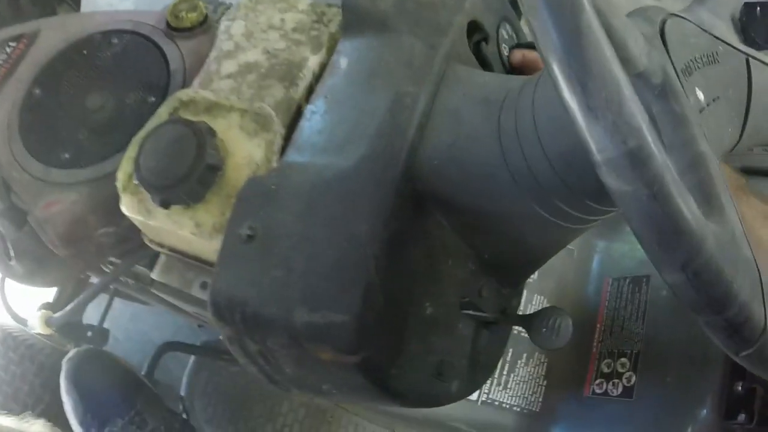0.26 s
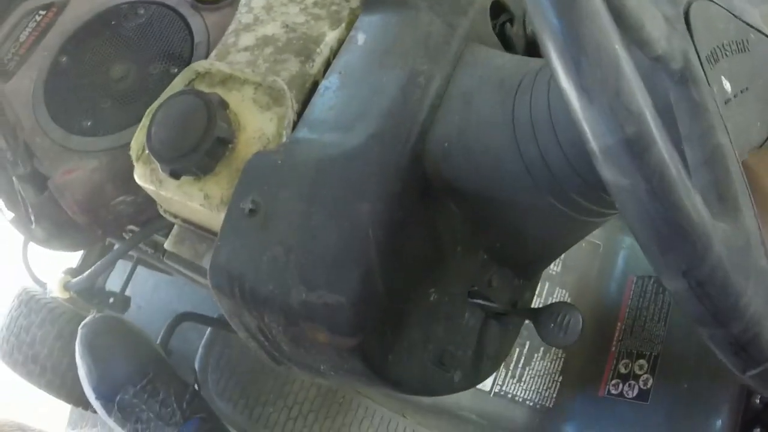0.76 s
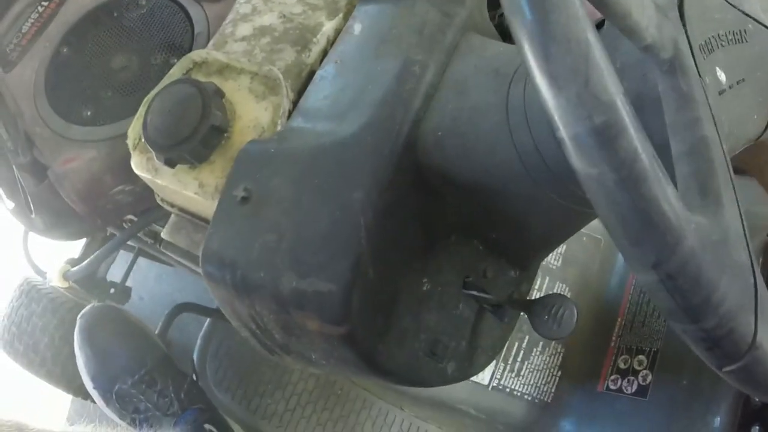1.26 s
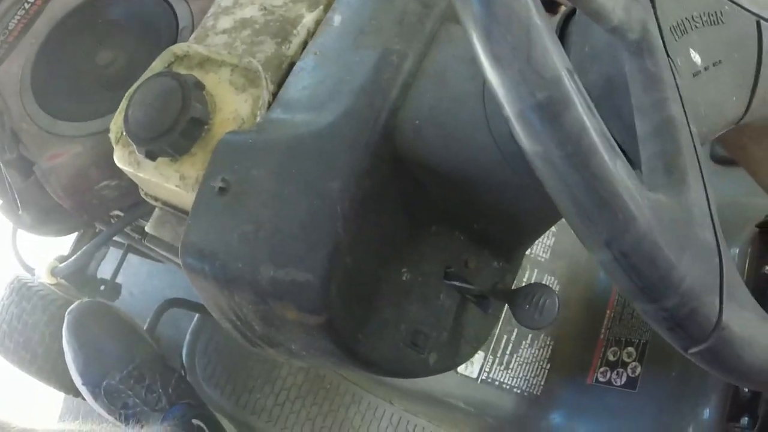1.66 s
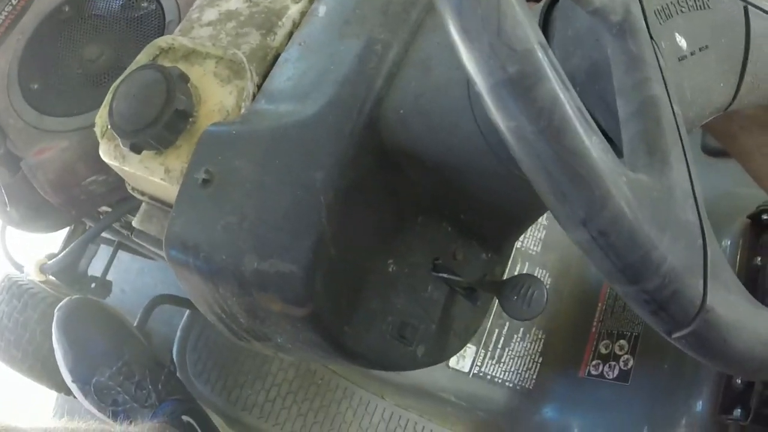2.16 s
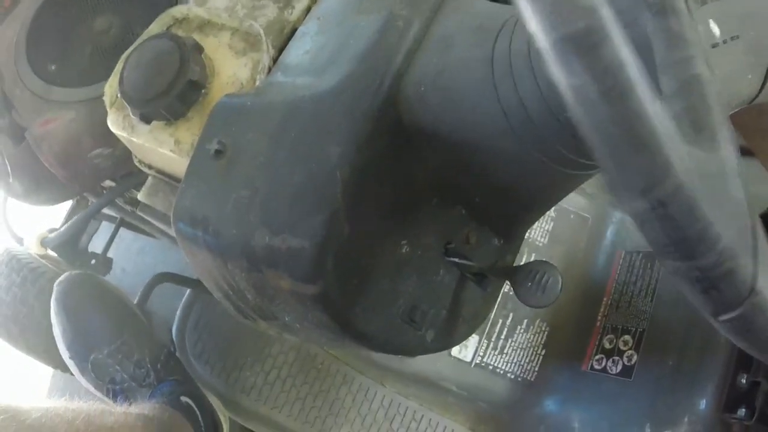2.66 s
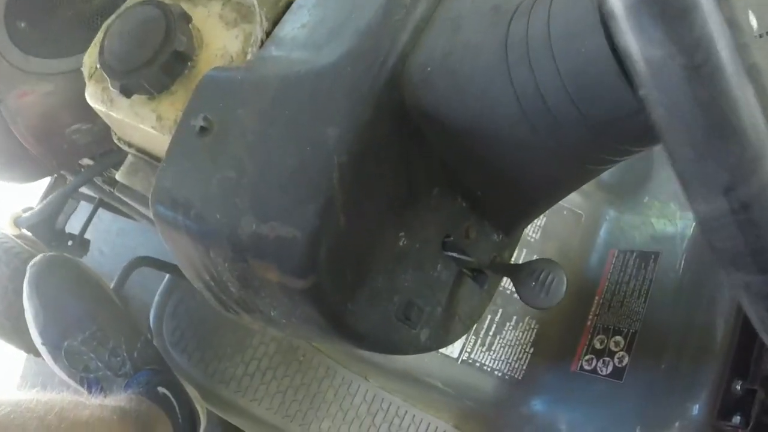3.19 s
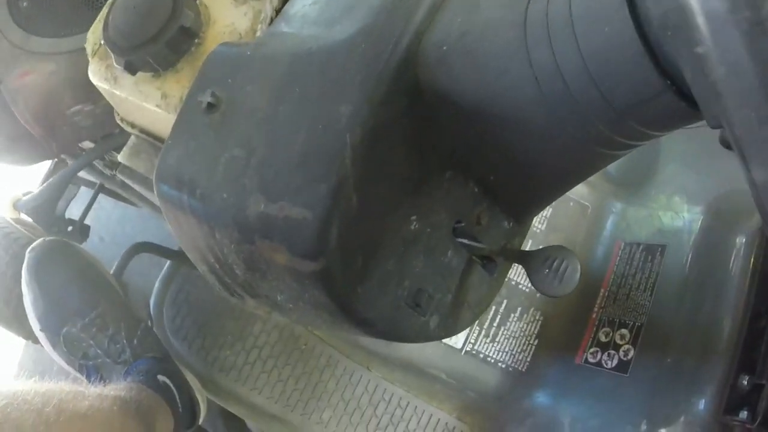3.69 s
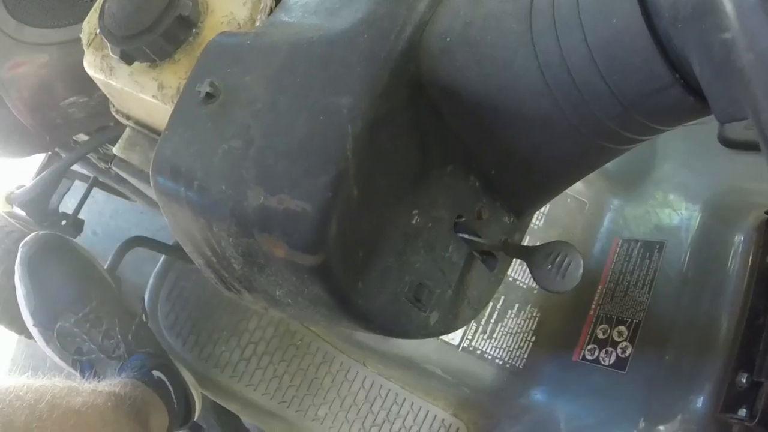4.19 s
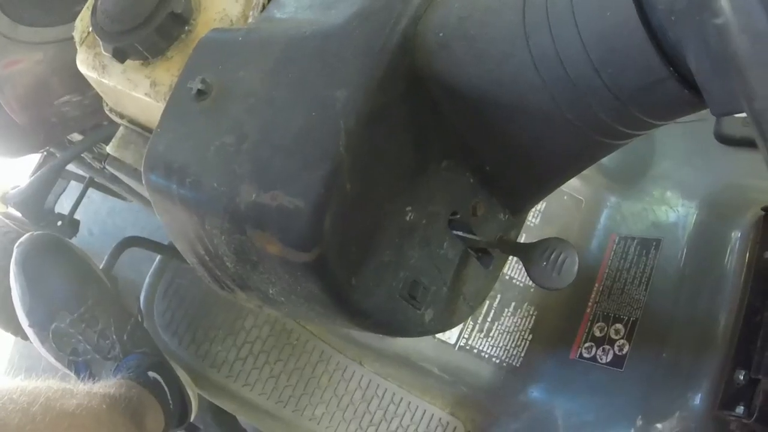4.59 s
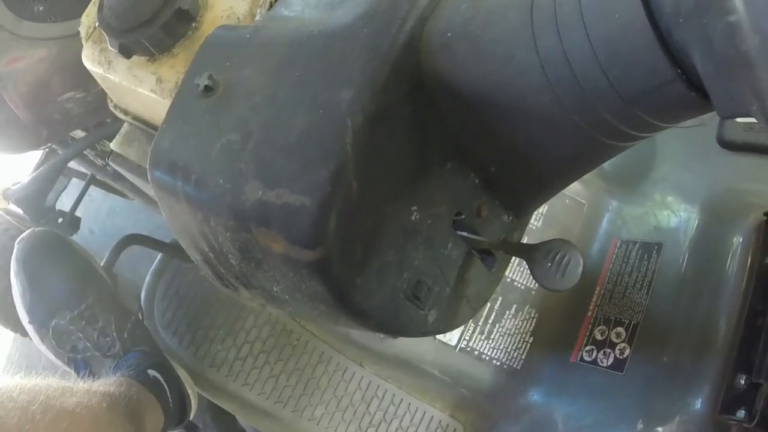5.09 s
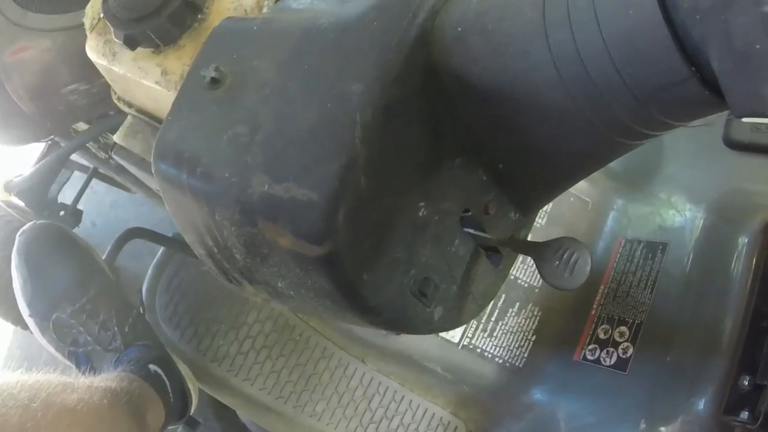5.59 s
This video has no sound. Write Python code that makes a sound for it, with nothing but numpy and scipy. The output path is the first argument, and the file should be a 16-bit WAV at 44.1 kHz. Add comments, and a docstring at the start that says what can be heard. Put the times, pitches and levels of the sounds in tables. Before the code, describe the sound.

Starter gear clanks and clunks against a stubborn engine, with brief growling, whining turns and sinking groans, never catching, in an echoing garage.

```python
"""The dying echo of a blow, then faint outdoor air and harder clanks: a riding mower in a garage will not start,
heard from the seat. The starter pinion clanks into the ring gear and clunks back; every blow rings the same block
and frame. In between, gear teeth rumble, whine and grind for a weak stroke or groan to a stall on compression. Dry
metal ticks and squeaks, valves puff, and once the freed starter whirrs down. Walls and floor return an echo."""
import sys
import numpy as np
from scipy import signal
from scipy.fft import rfft, irfft, next_fast_len
from scipy.io import wavfile
from scipy.ndimage import uniform_filter1d

SR = 44100
rng = np.random.default_rng(int(sys.argv[2]) if len(sys.argv) > 2 else 0)


def store_pcm(level_fs):
    """Save levels as 16-bit WAV."""
    pcm = np.round(np.clip(level_fs, -1, 1) * 32767).astype(np.int16)
    wavfile.write(sys.argv[1], SR, np.atleast_2d(pcm).T)


N = 257984
T = np.arange(N) / SR
BINS = np.linspace(0, SR / 2, next_fast_len(N, True) + 1)  # filter frequencies in Hz

# engine block on its mounts, heavily damped: mode_hz, relative level_db, t60_s
BLOCK = [(457, 1, 0.053), (576.4, 0, 0.046), (621.4, -1, 0.048)]
# frame, deck and hood: mode_hz, relative level_db, t60_s
FRAME = [(131.2, -21.5, 0.19), (170.4, -23.5, 0.35), (220.3, -22.5, 1), (306.6, -10, 0.29),
         (322.8, -13, 0.82), (385.5, -7.5, 0.18), (457.5, -8.5, 0.13), (560, -7, 0.14), (561.8, -1, 0.096),
         (634, -2.5, 0.048), (698.8, -7, 0.11), (772, -6, 0.065), (910, -50, .12), (1018, -23.5, 0.16),
         (1277, -12, 0.092), (1904, -11.5, 0.056)]
# colour of clashing steel and of hissing air: frequency_hz, relative level_db
CLASH = [(59, -77.5), (100, -13.5), (231, 0), (594, 1.5), (867, -3.5), (1090, -8), (1190, -8),
         (1590, -14.5), (1920, -11), (2520, -18), (3110, -13), (8340, -25.5), (9860, -27.5), (15000, -44)]
# the starter drags the engine round, one row a stroke: start_s, run_up_s, start_mesh_hz, top_mesh_hz, rumble_db,
# rumble_swell_db over the run-up, grind_db, grind_rise_db_per_octave, whine_db, fade_db_per_s
STROKES = [(1.48, 0.48, 192.2, 574.8, -16, 11, -22, 22, -19.5, 182),
           (4.64, .215, 169.4, 351, -20.5, 24, -14, 57, -24.5, 250),
           (5.27, .1, 169.7, 340.9, -22, 19, -25.5, 34.5, -29, 173),
           (5.795, 0.012, 321, 335.5, -14, 9, -28, 40, -35, 280)]


def amp(db):
    """Decibels to gain."""
    return 10 ** (np.asarray(db) / 20)


def unit(x):
    """Scale to rms 1."""
    return x / np.sqrt(np.mean(x ** 2) + 1e-18)


def noise():
    """White noise."""
    return rng.standard_normal(N)


def walk(hz):
    """Smooth random wander with spread 1 and hz random knots a second."""
    knots = rng.standard_normal(N)
    return unit(np.interp(T * hz, np.arange(N), knots))


def fade(start, end, edge):
    """Gate that is open from start to end, with soft edges outside."""
    return np.clip(1 + np.minimum(T - start, end - T) / edge, 0, 1)


def burst(start, decay, rise):
    """Envelope of a contact: a quick rise and an exponential fall."""
    age = np.maximum(T - start, 0)
    return np.minimum(age / rise, 1) * np.exp(-np.maximum(age - rise, 0) / decay)


def swell(centre, half):
    """Bell-shaped envelope."""
    return np.exp(-((T - centre) / half) ** 2 / 2)


def on_log_axis(hz, points):
    """Read (Hz, value) points on a log-frequency axis."""
    f, value = np.transpose(points)
    return np.interp(np.log(np.maximum(hz, 1)), np.log(f), value)


def causal(x, gain):
    """Minimum-phase filter with the given gain on evenly spaced frequencies up to SR / 2."""
    size = 2 * (len(gain) - 1)
    cepstrum = irfft(np.log(gain), size)
    cepstrum[1:size // 2] *= 2
    cepstrum[size // 2 + 1:] = 0
    response = np.exp(rfft(cepstrum))
    return irfft(rfft(x, size) * response, size)[:N]


def colour(x, points):
    """Shape with a spectrum of (Hz, dB) points; white noise keeps its power."""
    return causal(x, unit(amp(on_log_axis(BINS, points))))


def resonance(at_hz, peaks):
    """Gain of a set of (Hz, width Hz, dB) resonances at the given frequencies."""
    return np.sqrt(sum(amp(db) ** 2 / (1 + (2 * (at_hz - hz) / width) ** 2) for hz, width, db in peaks))


def ringing(force, modes, corner_hz, tilt_db, build):
    """Ring a body's modes; a soft contact weakens those above the corner, and the panels take a moment to swing."""
    t = T[:SR // 2]
    ring = 0
    for k, (hz, db, t60) in enumerate(modes):
        octaves = np.log2(hz / BLOCK[0][0])
        gain = amp(db + tilt_db * octaves) / np.hypot(1, (hz / corner_hz) ** 2)
        mode = gain * np.sin(2 * np.pi * hz * t) * np.exp(-np.log(1000) * t / t60)
        ring = ring + (-1) ** k * mode
    return signal.fftconvolve(force, ring * (1 - np.exp(-t / build)))[:N]


def blows(table, spectrum, corner_hz, tilt_db, build, rise, grain_db, block_db):
    """Each blow knocks the block, rings the frame and sets loose steel parts chattering."""
    force, chatter = np.zeros(N), np.zeros(N)
    for s, ring_db, chatter_db, decay in table:
        force[int(s * SR)] += amp(ring_db)
        chatter += amp(chatter_db) * burst(s - rise / 2, decay, rise)
    contacts = unit(noise() * amp(grain_db * walk(900)))
    knock = amp(block_db) * ringing(force, BLOCK, corner_hz, 0, build=0.013)
    frame = ringing(force, FRAME, corner_hz, tilt_db, build)
    return knock + frame + colour(chatter * contacts, spectrum)


def slack_clunks():
    """The crank rocks back and the gears take up their slack: soft blows with a strong block knock."""
    # levels ahead of the trim in scene(): time_s, frame_ring_db, rattle_db, rattle_decay_s
    clunk_rows = [(.003, -46, -25, 0.033), (.603, -35, -36, 0.022), (1.932, -16.5, -16, 0.014),
                  (1.960, -14, -18.5, 0.081), (2.423, -17.5, -20, 0.025), (2.497, -28, -30.5, 0.024),
                  (3.506, -18, -20, 0.019), (4.352, -18, -17.5, 0.0098), (4.365, -36, -27, 0.0072),
                  (4.812, -23.5, -22.5, 0.062), (4.878, -20, -24, 0.025), (5.225, -19.5, -19, 0.029),
                  (5.388, -25, -29, 0.006), (5.434, -26.5, -21, 0.0027), (5.783, -14, -8.5, 0.02)]
    # colour of the rattle: frequency_hz, relative level_db
    rattle_points = [(50, -57), (120, -4.5), (300, 2), (480, 5), (620, -4.5), (800, -8), (1200, -20),
                     (1950, -16.5), (2700, -27), (3500, -21), (6600, -36.5), (11000, -44), (15000, -61)]
    return blows(clunk_rows, rattle_points, corner_hz=905, tilt_db=0.5, build=0.0021, rise=0.016,
                 grain_db=0, block_db=16.5)


def pinion_clanks():
    """The pinion slams into the ring gear: hard steel blows that ring the frame high up."""
    # levels ahead of the trim in scene(): time_s, frame_ring_db, steel_clash_db, clash_decay_s
    engage_rows = [(.004, -35, -37.5, 0.091), (.596, -27, -28.5, 0.0017), (.607, -31, -26, 0.0078),
                   (.641, -36, -33, 0.0047), (1.445, -12.5, -12, 0.012), (3.048, -22, -21.5, 0.019),
                   (3.848, -20, -21, 0.015), (4.595, -22, -20, 0.016), (5.770, -29, -13, 0.009),
                   (5.794, -42, -14, 0.011)]
    return blows(engage_rows, CLASH, corner_hz=3000, tilt_db=3.0, build=0.0053, rise=0.01,
                 grain_db=0.5, block_db=-25)


def outdoor_air():
    """Faint broadband air from outdoors, its level wandering slightly."""
    # frequency_hz, relative level_db
    air_points = [(12, -29), (20, -8), (59, -5), (84, -9.5), (118, -6), (211, -12), (571, -14), (841, -21),
                  (1210, -22), (1830, -26), (2340, -27), (5530, -35), (15000, -51)]
    level_db = -52 + 0.14 * walk(1.9)
    return unit(colour(noise(), air_points)) * amp(level_db)


def ticks():
    """Small dry contacts of key and linkage: short bursts of coloured noise."""
    # time_s, level_db, decay_s
    tick_rows = [(1.270, -47, 0.034), (1.362, -51.5, 0.037), (5.253, -36.5, 0.0059), (5.434, -40, 0.0062)]
    # frequency_hz, relative level_db
    tick_points = [(200, -4), (700, 7), (1500, 1.5), (2200, 0), (3000, -6.5), (10000, -15.5), (15000, -32)]
    envelope = sum(amp(db) * burst(s, decay, rise=0.0013) for s, db, decay in tick_rows)
    return colour(noise() * envelope, tick_points)


def glides(table, sag, wander, octave_db):
    """Short unsteady tones with their octave, each sinking through its pitch by the same share."""
    out = np.zeros(N)
    for s, length, hz, db, waver in table:
        on = (T >= s) & (T < s + length)
        progress = (T[on] - s) / length
        pitch = hz * (1 + sag * (.5 - progress)) * (1 + waver * wander[on])
        phase = 2 * np.pi * np.cumsum(pitch) / SR
        envelope = np.sqrt(np.abs(np.sin(np.pi * progress)))
        out[on] += amp(db) * envelope * (np.sin(phase) + amp(octave_db) * np.sin(2 * phase))
    return out


def squeaks():
    """Stick and slip of dry metal in key switch and starter shaft: short falling whistles, some of them grainy."""
    # levels ahead of the treble filter: start_s, length_s, pitch_hz, level_db, pitch_waver_share
    squeak_rows = [(1.272, .06, 2215, -57, 0.0093), (1.56, .051, 6430, -43, 0.049),
                   (1.748, 0.022, 9280, -41.5, 0.009), (2.125, 0.031, 6605, -37, 0.014),
                   (3.162, 0.042, 6490, -49, 0.013), (3.958, 0.026, 6440, -45.5, .008),
                   (4.244, 0.031, 6340, -44, 0.0029), (4.263, .037, 6320, -30, 0.0032),
                   (4.838, 0.028, 6840, -35, 0.016), (5.35, 0.022, 3990, -43.5, 0.126),
                   (5.35, .035, 9500, -55.5, 0.02), (5.49, 0.016, 9200, -57, .02),
                   (5.781, 0.011, 6980, -25.5, 0.0067), (5.81, 0.024, 9200, -36, .009)]
    # the highest overtones fall away: frequency_hz, relative level_db
    treble_points = [(13000, 26), (14200, -26)]
    whistles = glides(squeak_rows, sag=0.03, wander=walk(1200), octave_db=-15.5)
    return colour(whistles, treble_points)


def mesh_rate():
    """Teeth meshing per second: each stroke gathers speed evenly, then slows no further than its start rate."""
    slowing_hz_per_s = 200
    hz = np.full(N, 1. * STROKES[0][2])
    for s, run_up, start_hz, top_hz, *_ in STROKES:
        spent = np.maximum(T - s - run_up, 0)
        speed = np.interp(T, [s, s + run_up], [start_hz, top_hz]) - slowing_hz_per_s * spent
        hz = np.where(T >= s, np.maximum(speed, start_hz), hz)
    return hz


def rotor_rub(turns):
    """The rotor passes the same roughness on every turn: a comb of lines that glides with its speed."""
    track = signal.resample(rng.standard_normal(size=256), num=4096)
    return unit(np.interp(turns % 1, np.linspace(0, 1, len(track)), track))


def mesh_force(teeth):
    """Teeth knock and slide on each other over the growling rotor, which turns once in four teeth."""
    size = amp(1.0 * noise()[teeth.astype(int)])  # worn teeth bear unevenly: 1 dB spread
    knocks = unit(np.diff(np.floor(teeth), prepend=0) * size)
    sliding = unit(noise() * size * np.exp(-(teeth % 1) / 0.42))  # dies off within each tooth
    growl = rotor_rub(teeth / 4)
    judder = amp(3.5 * walk(70))  # the load snatches
    return unit(judder * (sliding + amp(-6) * (knocks - knocks.mean()) + amp(2) * growl))


def tooth_scrape(force):
    """Tooth flanks scrape dry for a moment: brief bright swells of the mesh force."""
    # levels ahead of the common trim: centre_s, half_length_s, level_db
    scrape_rows = [(1.481, .008, -28), (1.703, 0.027, -40), (1.77, 0.024, -37.5), (1.855, .016, -38),
                   (1.968, 0.0088, -41.5), (4.851, 0.011, -39), (5.438, 0.0032, -39.5),
                   (5.793, 0.0054, -24)]
    # frequency_hz, relative level_db
    scrape_points = [(4000, -14), (7000, 6), (9800, 7), (12000, -7), (15000, -10)]
    trim_db = -8.5
    envelope = sum(amp(db) * swell(s, half) for s, half, db in scrape_rows)
    return unit(colour(force, scrape_points)) * envelope * amp(trim_db)


def cranking():
    """The mesh force makes the frame rumble and the housing grind, and the gears whine at the mesh rate."""
    # colours of rumble and of grind: frequency_hz, relative level_db
    rumble_points = [(53, -40), (90, -29.5), (286, 0), (318, -1.5), (515, -1.5), (567, -14), (687, -1),
                     (742, -16.5), (900, -34.5), (1170, -24.5), (1980, -120)]
    grind_points = [(450, -30), (780, -1.5), (1050, -3.5), (1400, -1), (1800, -2), (2600, -11), (3400, -8),
                    (4400, -12.5), (6300, -12.5), (7500, -34), (11000, -74)]
    # flywheel and starter housing: centre_hz, width_hz, relative level_db
    housing_peaks = [(684, 10, 10), (806, 23, 6.5), (893, 20, 6), (1001, 19, 3.5), (1056, 28, 2),
                     (1200, 20, -24), (1312, 20, -2), (1440, 21, 3.5), (1552, 27, -4.5), (1790, 22, 1),
                     (1787, 19, 4), (1936, 38, -6), (1950, 50, -16)]
    # the whine stands out where the mesh rate sweeps through these frame resonances: centre_hz, width_hz, level_db
    whine_peaks = [(337, 52, -2.5), (554, 64, -3)]
    hardest_grind_hz, ease_db_per_octave = 409, 13

    speed = mesh_rate()
    teeth = np.cumsum(speed * (1 + .007 * walk(120))) / SR  # slightly jittered count of teeth
    force = mesh_force(teeth)

    frame = unit(ringing(force, FRAME, corner_hz=972, tilt_db=-0.5, build=0.021))
    rumble = unit(unit(colour(force, rumble_points)) + amp(-3) * frame)

    housing = unit(causal(force, resonance(BINS, housing_peaks)))
    grind = unit(unit(colour(force, grind_points)) + amp(-2) * housing)
    octaves = np.log2(speed / hardest_grind_hz)
    # above the hardest rate the flywheel carries part of the load
    grind = grind * amp(-ease_db_per_octave * np.maximum(octaves, 0))

    tones = np.sin(2 * np.pi * teeth) + amp(-7) * np.sin(4 * np.pi * teeth)
    whine = resonance(speed, whine_peaks) * tones

    out = tooth_scrape(force)
    for s, run_up, _, _, rumble_db, swell_db, grind_db, grind_rise_db, whine_db, fade_db in STROKES:
        effort = np.clip((T - s) / run_up, 0, 1)
        spent = np.maximum(T - s - run_up, 0)
        envelope = fade(s, T[-1], edge=0.019) * amp(-fade_db * spent)
        stroke = rumble * amp(rumble_db - swell_db * (1 - effort))
        stroke = stroke + whine * amp(whine_db)
        stroke = stroke + grind * amp(grind_db + grind_rise_db * np.minimum(octaves, 0))
        out = out + envelope * stroke
    return out


def puffs():
    """The piston shoves air through a valve: a low thump with a hiss."""
    # centre_s, half_length_s, thump_db, hiss_db
    puff_rows = [(1.574, 0.017, -36, -32), (1.869, 0.016, -34.5, -19), (1.99, 0.019, -43, -47),
                 (5.801, 0.017, -45, -28)]
    # colour of the thump: frequency_hz, relative level_db
    thump_points = [(20, -17), (40, 7), (100, 4), (170, -3), (400, -37)]
    thump, hiss = colour(noise(), thump_points), colour(noise(), CLASH)
    return sum(swell(s, half) * (amp(thump_db) * thump + amp(hiss_db) * hiss)
               for s, half, thump_db, hiss_db in puff_rows)


def stalls():
    """The loaded gears slow down against compression with a rough sinking groan."""
    # start_s, length_s, pitch_hz, level_db, pitch_waver_share
    stall_rows = [(2.48, 0.093, 160, -34, 0.039), (3.08, 0.091, 368, -29, .14),
                  (3.14, 0.13, 218.7, -35.5, 0.022), (3.88, 0.099, 280.8, -37.5, 0.244),
                  (4.62, 0.092, 287.4, -37, 0.28)]
    return glides(stall_rows, sag=0.12, wander=walk(300), octave_db=-17.5)


def coasting():
    """The freed starter whirrs down once: sinking lines over the soft rub of its brushes."""
    # frequency_hz, relative level_db
    whirr_points = [(700, -4), (1000, -5.5), (1450, -20), (1750, 3.5), (2150, -5), (2800, -15), (3200, -3),
                    (4000, -10), (6800, -14), (7600, -23), (8600, -32), (10700, -27), (12000, -40),
                    (15000, -61)]
    start_s, attack_s, hold_s, length_s = 4.835, 0.017, 0.043, .38
    turns_hz, sag_hz_per_s = 113.3, 43
    level_db, fade_db_per_s = -38, 58

    age = np.clip(T - start_s, 0, length_s)
    speed = (turns_hz - sag_hz_per_s * age) * (1 + 0.0016 * walk(40))
    turns = np.cumsum(speed) / SR
    brushes = amp(-14) * noise()
    whirr = unit(colour(rotor_rub(turns) + brushes, whirr_points))
    db = level_db - fade_db_per_s * np.maximum(age - attack_s - hold_s, 0)
    gate = fade(start_s, start_s + length_s, edge=.02)
    return whirr * amp(db) * np.minimum(age / attack_s, 1) * gate


def garage(x):
    """Diffuse echo of walls and floor: noise in octave bands, each with its own decay, shortest at the top."""
    # frequency_hz, t60_s
    decay_points = [(100, 0.5), (300, 0.64), (700, 0.39), (2000, 0.51), (6000, 0.41), (13000, 0.18)]
    wet_db, gap_s, even = -2.0, 0.01, 0.36  # even: share of the noise echo's ripple that is taken out

    t = T[:SR]
    wash = rfft(rng.standard_normal(len(t)))
    hz = np.fft.rfftfreq(len(t), 1 / SR)
    octave = np.log2(np.clip(hz, 62.5, 16000) / 1000)
    echo = 0
    for k in range(-4, 5):  # octaves from 1 kHz
        t60 = on_log_axis(1000 * 2. ** k, decay_points)
        envelope = np.exp(-np.log(1000) * t / t60) * np.clip(t / gap_s - .5, 0, 1)
        band = irfft(wash * np.maximum(1 - np.abs(octave - k), 0), len(t))
        echo = echo + band * envelope / np.linalg.norm(envelope)
    response = signal.unit_impulse(len(t)) + amp(wet_db) * echo
    # part of the noise echo's ripple is taken out, for a smoother, less tonal room
    power = np.abs(rfft(response, 2 * (len(BINS) - 1))) ** 2
    ripple = uniform_filter1d(power, size=90) / uniform_filter1d(power, size=5000)
    return causal(signal.fftconvolve(x, response)[:N], ripple ** (-even / 2))


def scene():
    """The mower in its garage over faint outdoor air."""
    hits = amp(-2.5) * (slack_clunks() + pinion_clanks())  # the first rows stand for the tail of an earlier blow
    mower = hits + ticks() + squeaks() + cranking() + puffs() + stalls() + coasting()
    return (garage(mower) + outdoor_air())[None]


def record(dry):
    """The microphone clips at full scale, then a steep low-pass cuts the top."""
    top_hz = 15250
    low_pass = signal.ellip(10, .2, 80, top_hz, fs=SR, output="sos")
    return signal.sosfilt(low_pass, np.clip(dry, -1, 1))


dry = scene()
out = record(dry)
store_pcm(out)
```